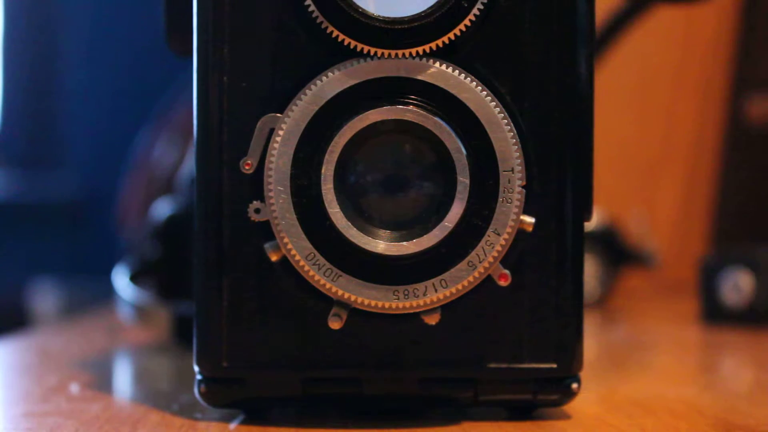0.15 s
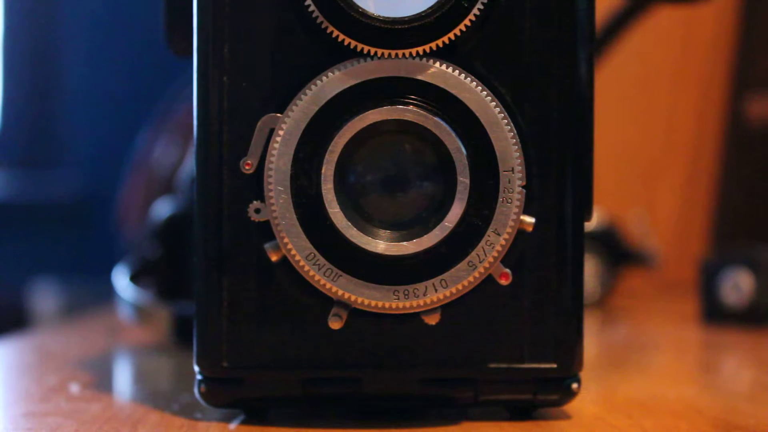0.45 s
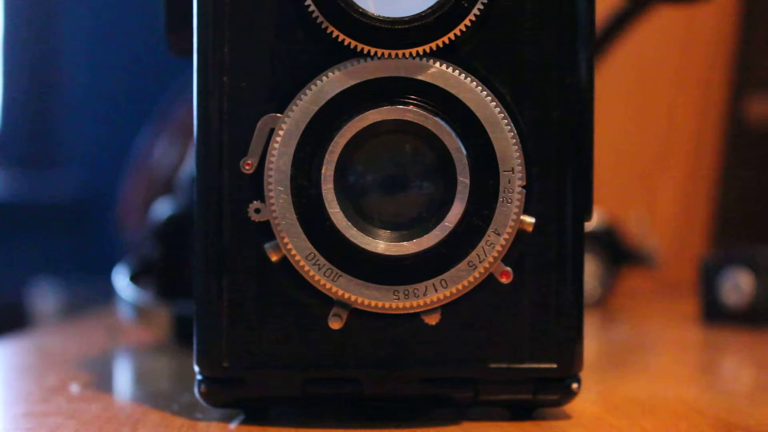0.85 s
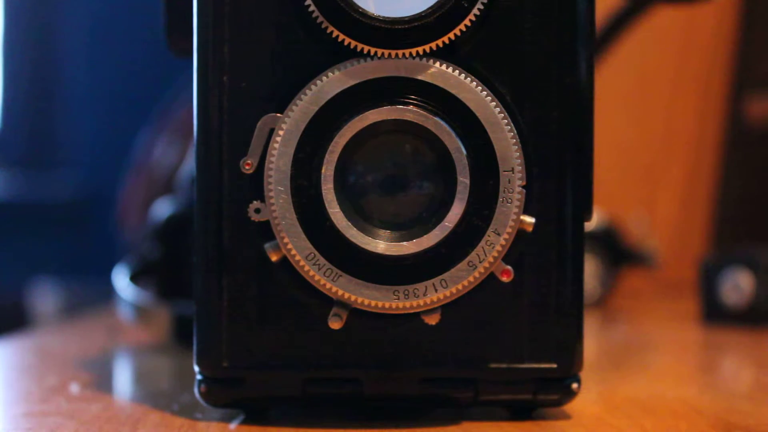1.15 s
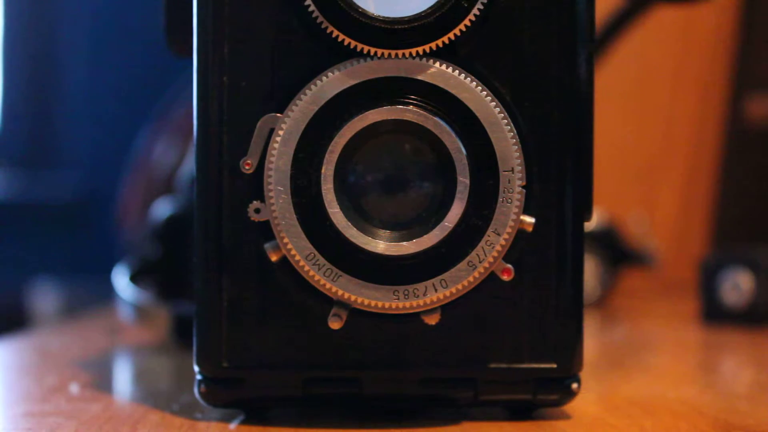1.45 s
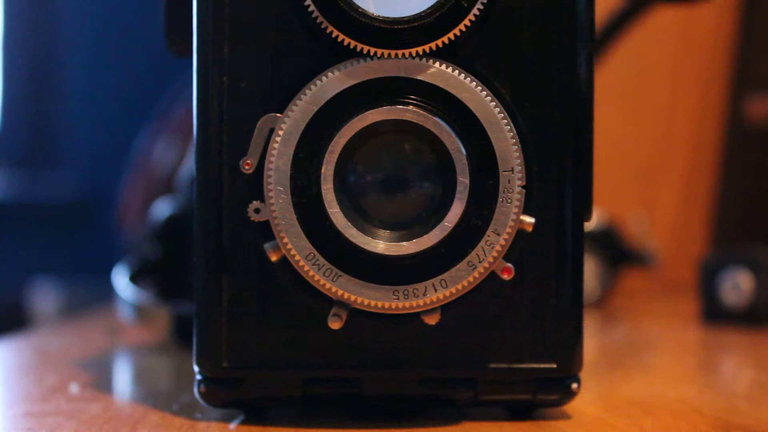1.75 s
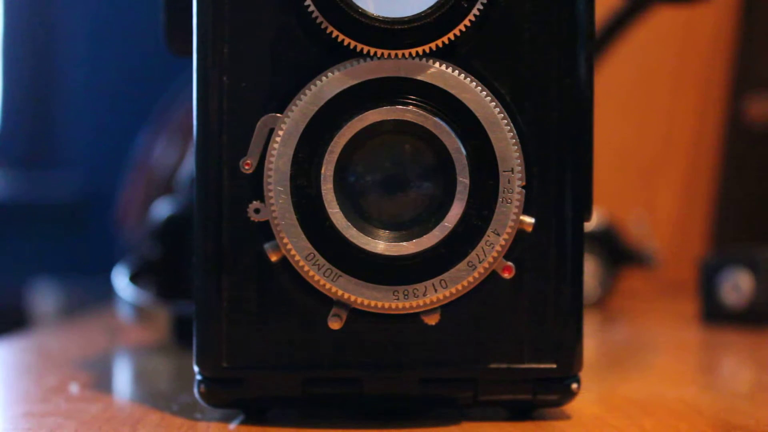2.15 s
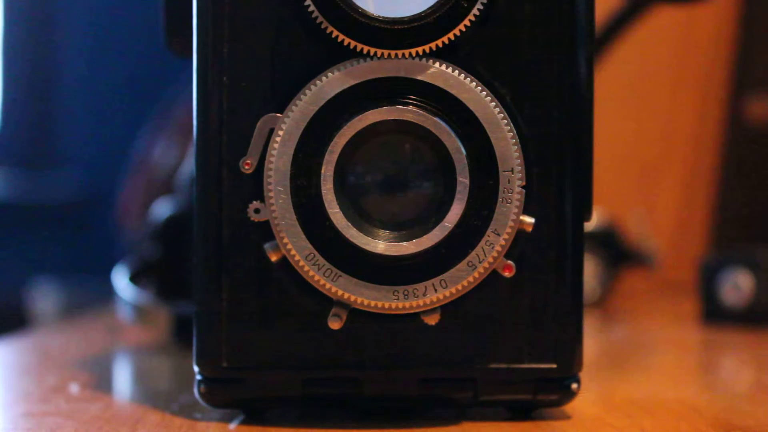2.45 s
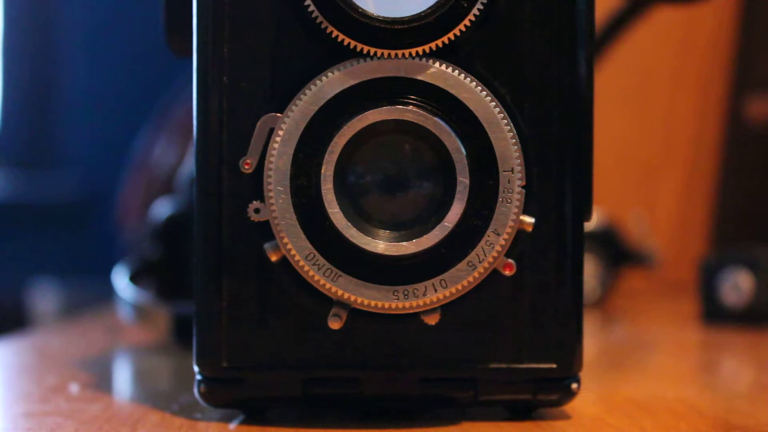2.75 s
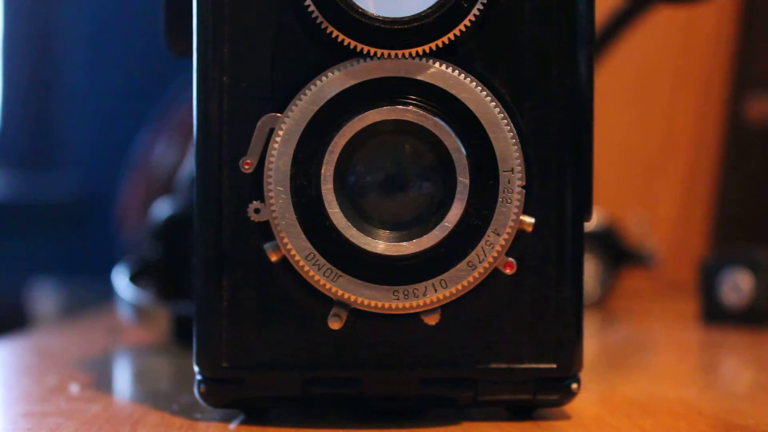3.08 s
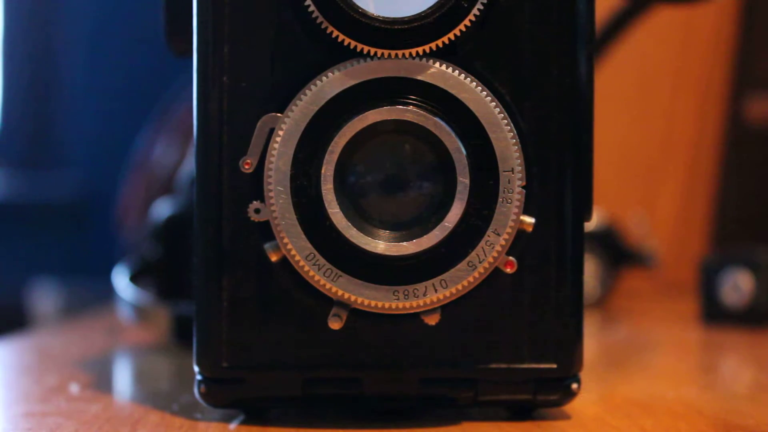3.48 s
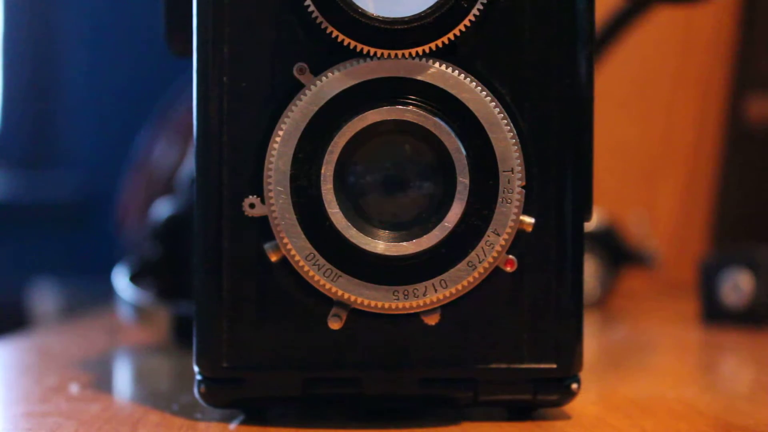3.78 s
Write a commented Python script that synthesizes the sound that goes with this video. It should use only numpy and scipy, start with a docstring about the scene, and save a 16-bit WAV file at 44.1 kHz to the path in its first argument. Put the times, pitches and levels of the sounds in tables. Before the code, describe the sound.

Clockwork camera self-timer ticking in a fast metallic buzz, ending in a sharp double shutter clack

```python
"""The clockwork self-timer of an old camera buzzes on a table in a quiet room, close to the microphone.
Its pallet rocks tick-tock over an uneven wheel: each contact rings the frame's modes and cracks as noise.
Then the shutter snaps open, a faster governor rattles through the exposure, the blades slam shut and the
governor runs back. Gears whirr and rush as shaped noise, the hollow body booms, a noise tail is the room's
answer; room noise, a wavering hum and fuzzy tones lie beneath."""
import sys
import numpy as np
from scipy import signal
from scipy.fft import rfft, irfft, next_fast_len
from scipy.io import wavfile
from scipy.ndimage import map_coordinates

SR = 44100
rng = np.random.default_rng(int(sys.argv[2]) if len(sys.argv) > 2 else 0)


def volts(x):
    """Linear amplitude factor 10**(x/20) for a level x in dB, scalar or array-like."""
    e = np.asarray(x, float) / 20
    return 10 ** e


def int16_out(signal):
    """Quantize to a 16-bit WAV file."""
    q = np.round(np.clip(np.atleast_2d(signal).T, -1, 1) * 32767)
    wavfile.write(sys.argv[1], SR, q.astype(np.int16))


N = 172872

# timer frame modes, relative levels: mode_hz, tick_db, tock_db, t60_s
TIMER_MODES = [(1570, -19, -19, .035), (2200, -9, -13, .01), (3150, -4, -9, .009), (3850, -11, -6, .009),
               (4170, -15, -13, .028), (5450, -6, -7, .006), (6450, -2, -1, .008), (7580, -1, -5, .01),
               (8650, -5, -5, .007), (9550, -9, -5, .007), (10900, -12, -3, .005), (13200, -4, -5, .004),
               (14900, -3, -11, .003)]
# shutter plate modes, relative levels: mode_hz, governor_tick_db, governor_tock_db, blade_blow_db, t60_s
PLATE_MODES = [(1370, -10, -10, -3, .015), (1690, -9, -9, -8, .016), (1940, -7, -7, -7, .018),
               (2900, -6, -8, -8, .006), (3900, -8, -5, -5, .007), (5400, -6, -6, -6, .008),
               (6150, -10, -9, -5, .008), (7550, -5, -1, 0, .01), (9700, -3, -5, -3, .006),
               (10700, -1, -6, -3, .005), (13400, -6, -6, -7, .004), (15100, -6, -4, -7, .004)]
# blade blows: start_s, level_db, chatter_s, low_modes_db
BLADE_BLOWS = [(3.7213, -19, .002, 0), (3.7238, -4.5, .0016, 6), (3.7260, -6, .003, 3),
               (3.8012, -1, .003, -6), (3.8040, -5, .002, -6), (3.8066, 1, .0015, -8)]
RELEASE_S = 3.7205
BEAT_JITTER_S, BEAT_SCATTER_DB = .0002, .9  # timer and governor


def along(points, hz):
    """Interpolates (Hz, value) points on a log frequency axis."""
    f, v = np.transpose(points)
    return np.interp(np.log(hz + 1), np.log(f + 1), v)


def wobble(knots_per_s):
    """A smooth random curve: a spline through normal draws."""
    knots = rng.standard_normal(int(N * knots_per_s / SR) + 4)
    return map_coordinates(knots, [np.arange(N) * knots_per_s / SR])


def filtered(x, response):
    """x times a response of frequency."""
    m = next_fast_len(N + 8192)
    return irfft(rfft(x, m) * response(np.fft.rfftfreq(m, 1 / SR)), m)[..., :N]


def strike(times, level_db, hz, mode_db, t60, chatter_s, crack_db, count=3):
    """Contacts within a chatter time ring decaying modes (mode_db: strikes x modes) and crack as noise."""
    contact_rise_s, crack_t60_s, mode_scatter_db, late_loss_db = .0002, .007, 1.5, 14
    t = np.arange(SR // 20) / SR
    rise = 1 - np.exp(-t / contact_rise_s)
    decay = volts(-60 * t / np.asarray(t60)[:, None])
    shapes = rise * np.sin(2 * np.pi * np.outer(hz, t)) * decay
    signs = (-1) ** np.arange(len(hz))
    rings, cracks = np.zeros((2, N + 2 * len(t)))
    chatters = np.broadcast_to(chatter_s, len(times))
    for start, db, levels, lasts in zip(times, level_db, mode_db, chatters):
        gains = volts(levels + mode_scatter_db * rng.standard_normal((count, len(hz)))) * signs
        # contact times as a share of the chatter; the first is at 0
        contact = np.arange(count)
        late = (contact + rng.random(count) / 2 * (contact > 0)) / count
        size = volts(db - late_loss_db * late)[:, None] / np.sqrt(count)
        ring = size * gains @ shapes / np.linalg.norm(gains, axis=1, keepdims=True)
        noise = rng.standard_normal((count, len(t)))
        crack = size * rise * volts(crack_db - 60 * t / crack_t60_s) * noise
        for k, after in enumerate(late * lasts):
            at = round((start + after) * SR)
            rings[at:][:len(t)] += ring[k]
            cracks[at:][:len(t)] += crack[k]
    # cracks take the colour of the mean mode levels
    mean_db = np.mean(mode_db, 0)
    low_hz = hz[0] / 2
    colour = [(low_hz, -40), *zip(hz, mean_db - mean_db.max())]
    rings = filtered(rings[:N], lambda f: 1 / (1 + (low_hz / (f + 1)) ** 4))
    return rings + filtered(cracks[:N], lambda f: volts(along(colour, f)))


def timer():
    """Drag stretches the waits of each half turn by their shares; a beat after a long wait lands weaker."""
    # starts of the timer wheel's half turns, five beats each: start_s
    half_turns = [0.004, 0.0656, 0.1254, 0.1868, 0.2522, 0.3232, 0.3931, 0.4572, 0.5189, 0.5807, 0.6486,
                  0.7173, 0.783, 0.8462, 0.9063, 0.9713, 1.0319, 1.0933, 1.1546, 1.2184, 1.2852, 1.3509,
                  1.4097, 1.4675, 1.5245, 1.6022, 1.6828, 1.758, 1.8301, 1.9, 1.9697, 2.0448, 2.1085,
                  2.1739, 2.239, 2.3125, 2.3854, 2.4532, 2.5168, 2.5805, 2.6469, 2.7134, 2.78, 2.8469,
                  2.9114, 2.983, 3.0514, 3.1187, 3.1941, 3.2728, 3.3592, 3.4523, 3.5329, 3.6088, 3.6777,
                  3.7445]
    # ten beats of a turn: shortest_wait_ms to the next beat, drag_share of that wait
    beat_waits = [(12, 1), (11.7, .4), (12.3, 1), (10, .4), (11.7, 1.1), (10.7, .4), (13.7, 1.5),
                  (10.5, .3), (11.8, 1.2), (10.5, .4)]
    # spring force on the pallet: time_s, level_db
    force = [(0, -25), (1.45, -23.5), (1.6, -25.5), (2.25, -24.5), (3.5, -26)]
    # dips in the timer's radiation: centre_hz, width_hz
    dips = [(11550, 350), (12250, 500)]
    # a tight spot in the train gathers the drag
    tight_at_beat, tight_every_beats, tight_width_beats, tight_extra_share = 25.2, 25.3, 1.8, 4
    loss_per_wait_doubling_db, usual_wait_s = 5.5, .013
    treble_fade_db_per_s, treble_over_hz = 0.5, 10000

    half = np.arange(len(half_turns) - 1) % 2
    least_ms, share = np.transpose(beat_waits).reshape(2, 2, 5)[:, half]
    least_s = least_ms / 1000
    beat = np.arange(share.size).reshape(share.shape)
    half_cycle = tight_every_beats / 2
    off = (beat - tight_at_beat + half_cycle) % tight_every_beats - half_cycle
    share = share * (1 + tight_extra_share * np.exp(-(off / tight_width_beats) ** 2))
    drag_s = np.diff(half_turns) - least_s.sum(1)
    waits = (least_s + drag_s[:, None] * share / share.sum(1, keepdims=True)).ravel()
    times = half_turns[0] + np.append(0, np.cumsum(waits)[:-1])
    times = times + BEAT_JITTER_S * rng.standard_normal(len(waits))

    before = np.append(usual_wait_s, waits[:-1])
    db = np.interp(times, *np.transpose(force))
    db = db - loss_per_wait_doubling_db * np.log2(before / usual_wait_s)
    db = db + BEAT_SCATTER_DB * rng.standard_normal(len(times))
    hz, tick, tock, t60 = np.transpose(TIMER_MODES)
    sides = np.array([tick, tock])[np.arange(len(times)) % 2]
    sides = sides - treble_fade_db_per_s * np.outer(times, hz > treble_over_hz)
    runs = times < RELEASE_S
    beats = strike(times[runs], db[runs], hz, sides[runs], t60, chatter_s=0, crack_db=0, count=1)
    return filtered(beats, lambda f: np.prod([(f - c - .15j * w) / (f - c - .5j * w) for c, w in dips], 0))


def gears():
    """Rubbing noise through the timer's modes, favouring longer-ringing ones, until the release."""
    level_db = -57
    hz, tick, tock, t60 = np.transpose(TIMER_MODES)[:, :, None]
    width_hz = np.log(1000) / np.pi / t60

    def modes(f):
        resonance = 1 / (1 + (2 * (f - hz) / width_hz) ** 2)
        return np.sqrt(np.sum(volts(tick + tock) * t60 ** 2 * resonance, 0))

    whirr = filtered(rng.standard_normal(N), modes)
    return volts(level_db) * whirr / whirr.std() * (np.arange(N) < RELEASE_S * SR)


def room(x):
    """A dying noise tail of unit energy, drawn anew every tenth of a second of sound."""
    # room decay: band_hz, t60_s
    decay = [(2000, 0.1), (8000, 0.058)]
    delay_s = .003
    step, out = SR // 10, np.zeros(N + SR)
    for a in range(0, N, step):
        hz, t, z = signal.stft(rng.standard_normal(SR // 4), SR, nperseg=128)
        fade = volts(-60 * t / along(decay, hz)[:, None])
        tail = signal.istft(z * fade, SR, nperseg=128)[1]
        wet = signal.fftconvolve(x[a:a + step], tail / np.linalg.norm(tail))
        out[a + round(delay_s * SR):][:len(wet)] += wet
    return out[:N]


def air():
    """Steady shaped noise, a sine hum of wavering level and tones blurred by random sine and cosine gains."""
    # room noise spectrum, relative: band_hz, level_db
    spectrum = [(18, -40), (60, -12.5), (174, -14), (290, -2.5), (420, -9.5), (800, -3.5), (950, -11),
                (2000, -9.5), (5000, -14), (9000, -51.5), (16000, -19)]
    # hum level: time_s, rms_db
    hum_levels = [(.3, -68.5), (.45, -75), (.7, -67), (.8, -62.5), (1.8, -60), (1.95, -71), (2.25, -73.5),
                  (2.4, -63.5), (3.35, -59.5), (3.92, -72)]
    # fuzzy tones: pitch_hz, level_db, wander_knots_per_s
    fuzzy_tones = [(261.6, -65.5, 14), (356.2, -62, 20), (506.5, -61.5, 12)]
    noise_rms_db, hum_hz = -49, 120.3
    noise = filtered(rng.standard_normal(N), lambda hz: volts(along(spectrum, hz)))
    t = np.arange(N) / SR
    hum_rms = volts(np.interp(t, *np.transpose(hum_levels)))
    out = volts(noise_rms_db) * noise / noise.std()
    out = out + np.sqrt(2) * hum_rms * np.sin(2 * np.pi * hum_hz * t)
    for hz, db, wander in fuzzy_tones:
        phase = 2 * np.pi * hz * t
        out = out + volts(db) * (wobble(wander) * np.sin(phase) + wobble(wander) * np.cos(phase))
    return out


def governor(run, level_db, low_db, returning):
    """A limping pallet strikes the plate; on the return it evens out, speeds up and grows."""
    tock_db, low_under_hz = -3.5, 2400
    limp_kept_per_beat, speed_up_s, growth_db_per_beat = .8, .000007, .5  # return run only
    start, tick_to_tock, tock_to_tick, beats = run
    hz, tick, tock, _, t60 = np.transpose(PLATE_MODES)
    k = np.arange(beats)
    is_tock = k % 2
    limp = (tick_to_tock - tock_to_tick) / 2 * is_tock
    times = start + k * (tick_to_tock + tock_to_tick) / 2
    db = level_db + tock_db * is_tock
    if returning:
        limp = limp * limp_kept_per_beat ** k
        times = times - speed_up_s * k * k
        db = db + growth_db_per_beat * k
    times = times + limp + BEAT_JITTER_S * rng.standard_normal(beats)
    db = db + BEAT_SCATTER_DB * rng.standard_normal(beats)
    sides = np.array([tick, tock])[is_tock] + low_db * (hz < low_under_hz)
    return strike(times, db, hz, sides, t60, chatter_s=.001, crack_db=1.5)


def blades():
    """Blade blows ring the governor's plate in chattering contacts."""
    low_under_hz = 2400
    hz, _, _, blow, t60 = np.transpose(PLATE_MODES)
    start, db, chatter, low_db = np.transpose(BLADE_BLOWS)
    mode_db = blow + np.outer(low_db, hz < low_under_hz)
    return strike(start, db, hz, mode_db, t60, chatter, crack_db=10.5, count=6)


def shutter():
    """Governor and blades share a plate; its low modes speak while the spring drives the governor."""
    # each governor run: first_beat_s, tick_to_tock_s, tock_to_tick_s, beats (count)
    driven_run = (3.7307, .0038, .00484, 17)
    return_run = (3.8191, .0081, .0072, 14)
    driven = governor(driven_run, level_db=-7, low_db=5.5, returning=False)
    back = governor(return_run, level_db=-15, low_db=-16, returning=True)
    return driven + back + blades()


def rush():
    """Band noise of the governor's gears: they race while the blades are open, then run on more softly."""
    driven_db, return_db, under_hz = -31, -37, 5000
    over_hz = PLATE_MODES[0][0]
    opened_s, shut_s = BLADE_BLOWS[1][0], BLADE_BLOWS[-1][0]
    t = np.arange(N) / SR
    noise = filtered(rng.standard_normal(N),
                     lambda f: 1 / (1 + (over_hz / (f + 1)) ** 2) / (1 + (f / under_hz) ** 2))
    level = volts(np.where(t < shut_s, driven_db, return_db)) * (t > opened_s)
    return noise / noise.std() * level


def body():
    """The hollow camera body, knocked by the blades, rings two decaying sines: boom and knock."""
    # body modes, boom then knock: mode_hz, t60_s
    body_modes = [(261, 0.29), (400, 0.023)]
    # knocks: start_s, boom_db, knock_db
    thuds = [(3.7225, -39, -25), (3.803, -30.5, -31)]
    rise_s = 0.002
    out = np.zeros(N)
    for start, *levels in thuds:
        t = np.clip(np.arange(N) / SR - start, 0, None)
        rise = 1 - np.exp(-t / rise_s)
        for db, (hz, t60) in zip(levels, body_modes):
            out += rise * volts(db - 60 * t / t60) * np.sin(2 * np.pi * hz * t)
    return out


def scene():
    """The camera, its room and the air."""
    room_db = -14.5
    camera = timer() + gears() + shutter() + rush() + body()
    return (camera + volts(room_db) * room(camera) + air())[None]


def roll_off(x):
    """The treble ends steeply here."""
    return signal.sosfilt(signal.butter(12, 16990, fs=SR, output="sos"), x)


def record(dry):
    """Gain control ducks with the smoothed power of the sound so far; then a steep treble cut."""
    knee_db, slope, memory_s, top_hz = -30, 0.74, 0.49, 15900
    keep = np.exp(-1 / (memory_s * SR))
    power = signal.lfilter([1 - keep], [1, -keep], dry ** 2)
    ducked = dry * (1 + power / volts(2 * knee_db)) ** (-slope / 2)
    mix = filtered(ducked, lambda hz: hz < top_hz)
    return roll_off(mix)


dry = scene()
out = record(dry)
int16_out(out)
```